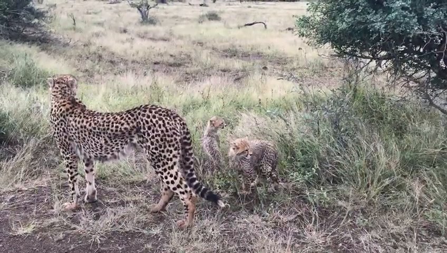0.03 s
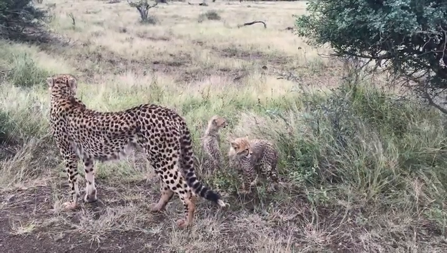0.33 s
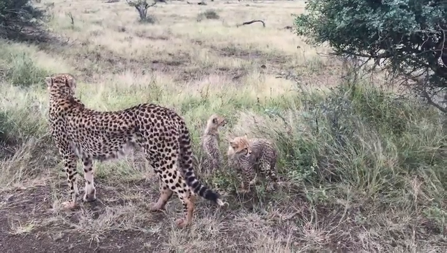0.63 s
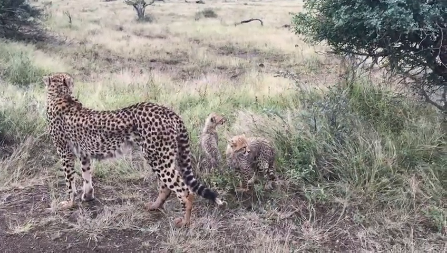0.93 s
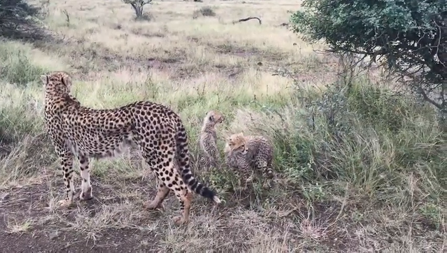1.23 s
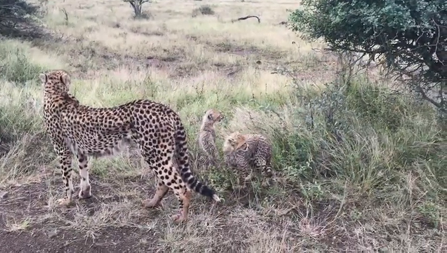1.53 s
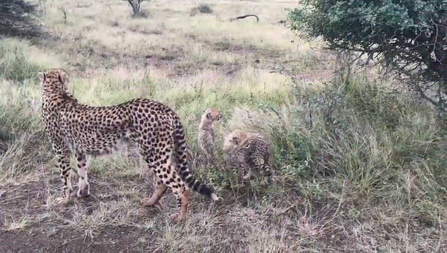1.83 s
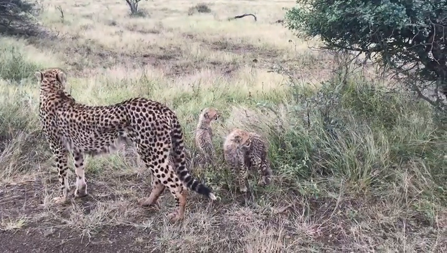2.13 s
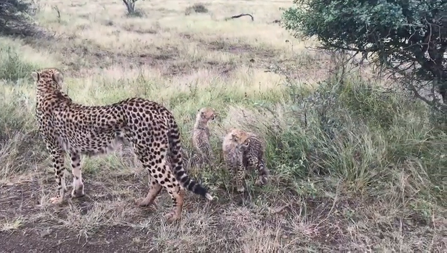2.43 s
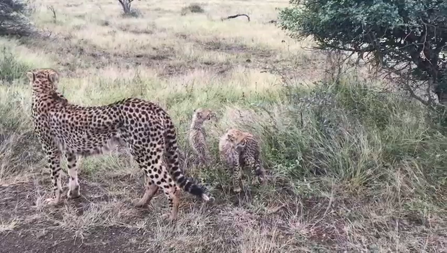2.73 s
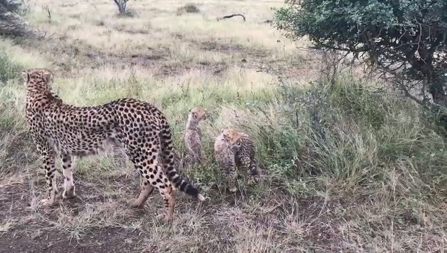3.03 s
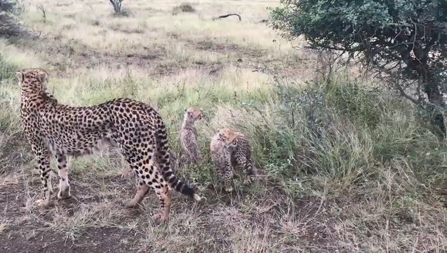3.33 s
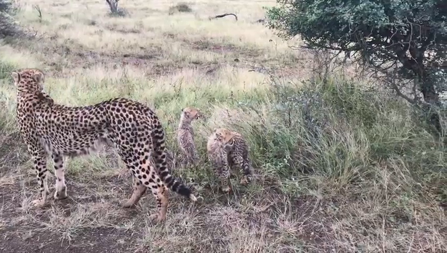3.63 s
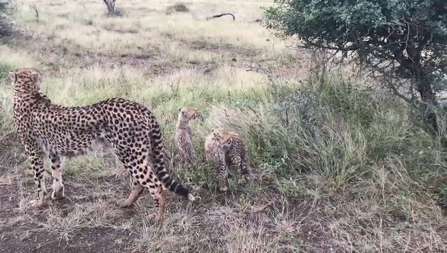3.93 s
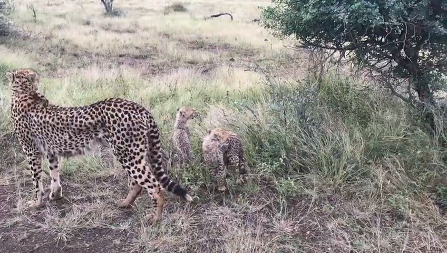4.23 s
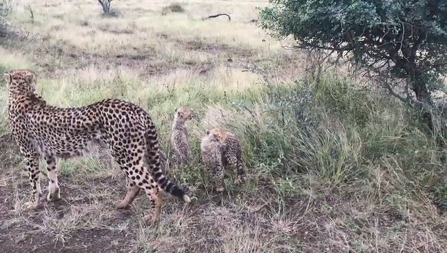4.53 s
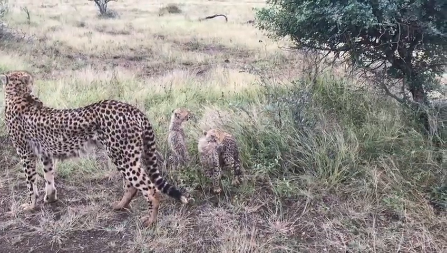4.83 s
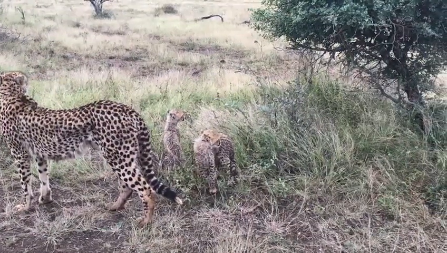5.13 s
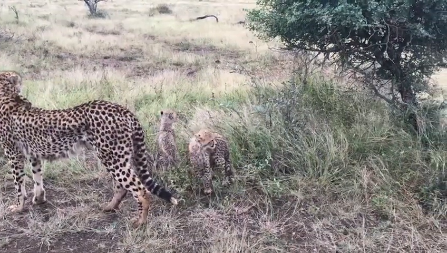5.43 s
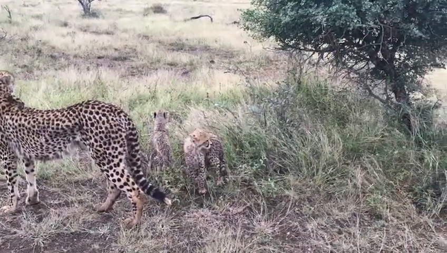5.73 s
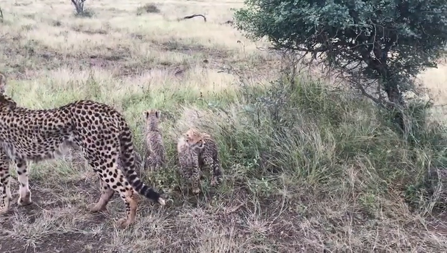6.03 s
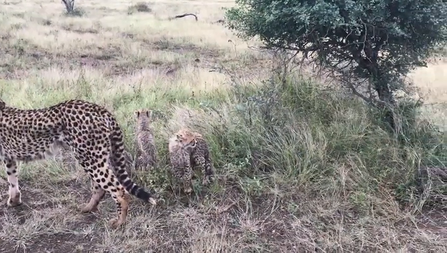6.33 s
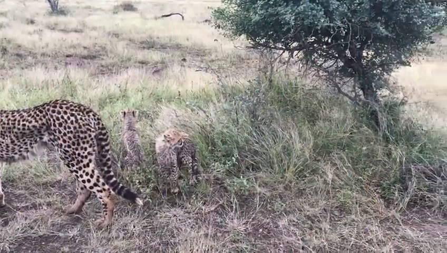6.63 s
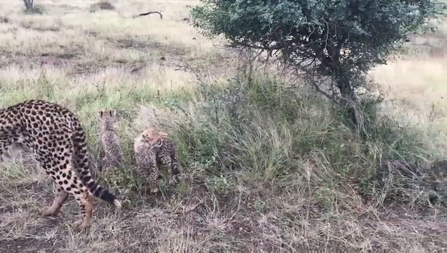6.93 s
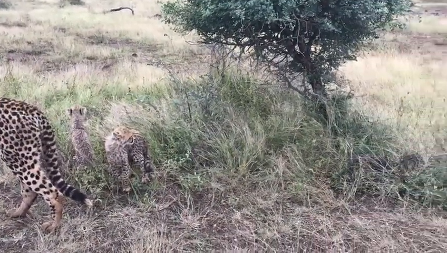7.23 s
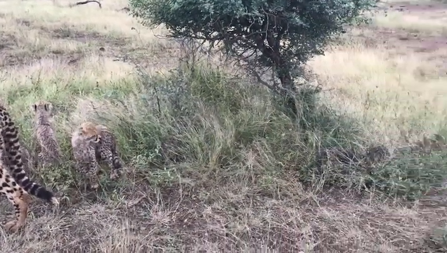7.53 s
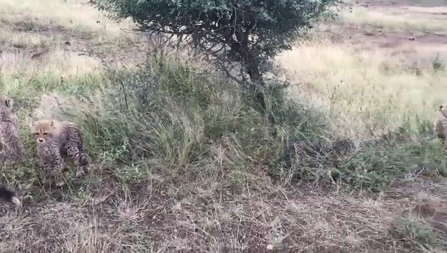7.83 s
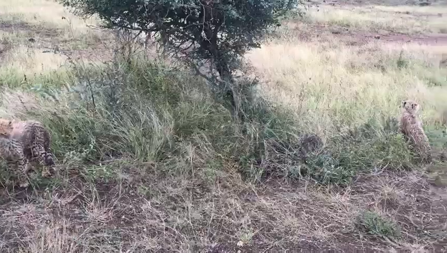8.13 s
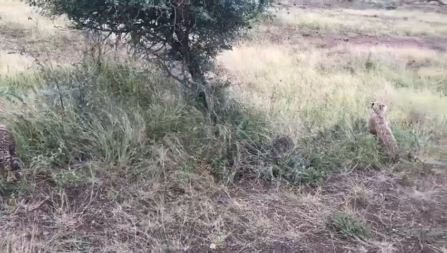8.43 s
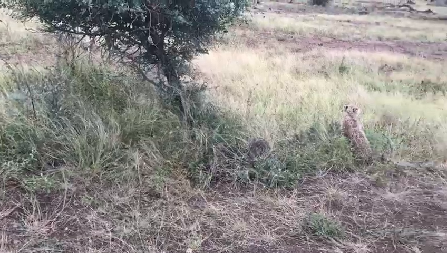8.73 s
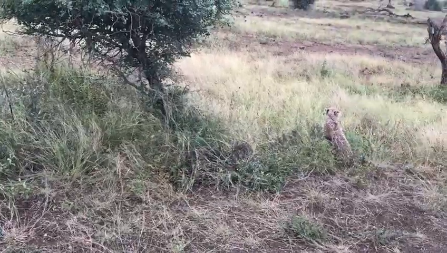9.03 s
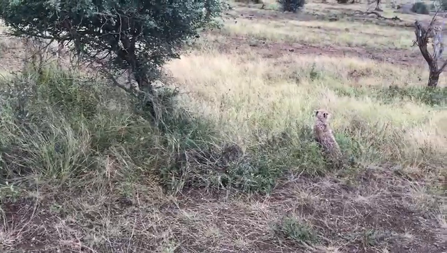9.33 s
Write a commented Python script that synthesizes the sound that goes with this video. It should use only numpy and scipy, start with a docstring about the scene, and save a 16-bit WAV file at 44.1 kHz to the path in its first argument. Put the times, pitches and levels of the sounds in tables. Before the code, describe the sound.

Several birds scold from a thicket in open grassland, packing harsh rasps, fast high rattles and thin sliding chips into a dense chatter, with a faint nasal churr below. Later they calm to soft chirps, then give a short buzzing run. A low wind rumble and a far engine rising and falling lie underneath, and dry grass crackles faintly now and then.

```python
"""Birds scolding in dry grassland

Unseen birds push puffs of air through syrinx and throat: harsh rasps, fast rattles, a nasal buzz,
high sliding chips, soft chirps and a low churr, all scattered back by the bushes.
A far engine rises and falls over a low wind rumble, and the dry grass crackles now and then."""
import sys
import numpy as np
from scipy import signal
from scipy.fft import rfft, irfft
from scipy.io import wavfile

SR = 44100
rng = np.random.default_rng(int(sys.argv[2]) if len(sys.argv) > 2 else 0)


def master(y):
    """Save y as 16-bit WAV."""
    cut = np.clip(np.atleast_2d(y).T, -1, 1)
    pcm = np.round(cut * 32767)  # scale
    wavfile.write(sys.argv[1], SR, pcm.astype(np.int16))


N = 418068
TICK_S = 0.0048
# low throat resonances of rasps and chirps: centre_hz, width_hz, level_db
LOW_THROAT = [(1094, 19, -26.5), (1817, 29, -17), (2195, 60, -11), (2682, 180, -8), (3510, 640, -9)]


def from_db(db):
    return 10 ** (np.asarray(db) / 20)


def unit_rms(x):
    return x / np.sqrt(np.mean(x ** 2) + 1e-20)


def phase_of(hz):
    return 2 * np.pi * np.cumsum(hz) / SR


def at_hz(points, hz):
    """Reads a spectrum on a log-frequency axis."""
    point_hz, db = np.transpose(points)
    return np.interp(np.log(hz + 1e-9), np.log(point_hz), db)


def add(out, start_s, sound):
    """Mixes a sound in at its start time."""
    i = max(round(start_s * SR), 0)
    out[i:i + len(sound)] += sound[:max(N - i, 0)]


def smooth(x, hz):
    """Two one-pole low-passes."""
    r = np.exp(-2 * np.pi * hz / SR)
    return signal.lfilter([(1 - r) ** 2], [1, -2 * r, r * r], x)


def drift(size, hz):
    """A smooth random wander, rms 1."""
    run_in = int(SR / hz)
    return unit_rms(smooth(rng.standard_normal(size + run_in), hz)[run_in:])


def resonate(source, resonances, bend, uneven_db=0):
    """Resonances whose centres all follow one bend; each rings at its own rms level."""
    out = 0
    for hz, width, db in resonances:
        carrier = np.exp(1j * phase_of(hz * bend))
        band = (smooth(source / carrier, 0.66 * width) * carrier).real
        out = out + from_db(db + uneven_db * rng.standard_normal()) * unit_rms(band)
    return out


def wind(level_db=-49.34):
    """A steady bed of air with a low rumble and a faint far hum in it."""
    # colour of the wind: frequency_hz, relative_db
    spectrum = [(25, -14), (55, 5.5), (140, 3.5), (300, -3.5), (390, -7), (750, -16), (1500, -20),
                (5200, -27.5), (12000, -39)]
    # rumble and hum bands: centre_hz, width_hz, level_db
    hums = [(49.5, 12.2, -52), (376.7, 29, -65)]
    colour = from_db(at_hz(spectrum, np.fft.rfftfreq(N, 1 / SR)))
    wash = unit_rms(irfft(rfft(rng.standard_normal(N)) * colour, N))
    return from_db(level_db) * wash + resonate(rng.standard_normal(N), hums, np.ones(N))


def far_engine(fade_db=2.0):
    """The firing tone and its overtones glide through the exhaust resonances, fading in and out."""
    # engine revs: time_s, firing_hz, level_db ahead of the exhaust
    revs = [(0.0, 69.1, -46), (0.37, 74.3, -34), (0.53, 79.8, -40.5), (0.71, 73.6, -49), (1.21, 75.78, -42),
            (1.631, 66.82, -51), (2.401, 68.56, -52), (2.949, 58.15, -60.5), (3.149, 56.35, -51.5),
            (5.5, 56.8, -65), (5.751, 60.85, -50), (6.07, 66.45, -51.5), (6.92, 58.38, -46.5),
            (7.29, 65.62, -49), (7.97, 52.6, -51), (8.5, 61.05, -51.5), (8.87, 61.04, -57),
            (9.48, 56.7, -57)]
    # exhaust colour: frequency_hz, gain_db
    exhaust = [(58, 6), (66, 3), (71, -17), (110, -1), (146, 1), (165, -6.5), (200, -2), (220, -36),
               (320, -30.5)]
    time_s, *columns = np.transpose(revs)
    hz, db = (np.interp(np.arange(N) / SR, time_s, column) for column in columns)
    out = np.zeros(N)
    for harmonic in range(1, 5):
        gain = from_db(db + at_hz(exhaust, harmonic * hz) + fade_db * drift(N, 3.24))
        out += gain * np.sqrt(2) * np.sin(harmonic * phase_of(hz))
    return out


def dry_grass(snaps_per_s=260):
    """Dry stems give way in clusters of small snaps."""
    # stirs of the grass: start_s, length_s, level_db
    rustles = [(1.49, 0.24, -56.5), (4.928, 0.34, -58), (6.293, .024, -52.5)]
    out = np.zeros(N)
    for start, length, db in rustles:
        size = int(length * SR)
        snaps = (rng.random(size) < snaps_per_s / SR) * rng.standard_normal(size)
        add(out, start, resonate(snaps, [(1320, 5400, db)], np.ones(size)))
    return out


def bushes(x, wet_db=-10.5, t60_s=0.2):
    """Leaves and stems scatter a short, faint tail."""
    t = np.arange(int(t60_s * SR)) / SR
    tail = rng.standard_normal(len(t)) * from_db(-60 * t / t60_s) * (t > .004)
    return x + from_db(wet_db) * signal.fftconvolve(x, tail / np.linalg.norm(tail))[:N]


def syrinx(size, pulse_hz, jitter, sharpness):
    """The syrinx opens in short, slightly uneven puffs; rms 1."""
    phase = phase_of(pulse_hz * (1 + jitter * drift(size, 169)))
    return unit_rms(np.abs(np.sin(phase / 2)) ** sharpness)


def whistle(hz, waver):
    """A tone whose pitch trembles from puff to puff."""
    return np.sqrt(2) * np.sin(phase_of(hz * (1 + waver * drift(len(hz), 740))))


def stammer(size, depth, hz=112):
    """A tremolo that breaks a tone into quick pips."""
    return 1 - np.clip(depth, 0, 1) * np.cos(phase_of(hz * (1 + 0.16 * drift(size, 41.6))))


def churrs(pulse_hz=430, wander=0.033):
    """A lower bird holds long nasal notes that swell and fade while its throat slowly shifts."""
    # held notes: start_s, length_s, level_db
    notes = [(0.198, 3.15, -59.5), (3.62, 0.73, -50), (4.621, 0.47, -54), (8.351, 0.81, -56)]
    # throat resonances: centre_hz, width_hz, gain_db
    throat = [(1092, 46, -16), (1880, 81, -9.5), (2190, 190, -1.5), (3000, 450, -11)]
    out = np.zeros(N)
    for start, length, db in notes:
        size = int(length * SR)
        air = syrinx(size, pulse_hz, jitter=0.104, sharpness=7) * rng.standard_normal(size)
        swell = np.sqrt(np.abs(np.sin(np.linspace(0, np.pi, size))))
        add(out, start, from_db(db) * swell * resonate(air, throat, 1 + wander * drift(size, 2.155)))
    return out


def pip(hz, db, length_s, sag=0.041):
    """A short, slightly rough tone that sags in pitch."""
    u = np.linspace(-1, 1, int(length_s * SR))
    grit = 1 + drift(len(u), hz / 10) / 2
    return from_db(db) * (1 - u ** 2) * grit * whistle(hz * (1 - sag * u), waver=0.03)


def ticks(pitch_hz=5100):
    """Lone pips between the calls, so short that they click."""
    # ticks: centre_s, level_db
    cues = [(4.405, -32), (4.585, -34)]
    out = np.zeros(N)
    for centre, db in cues:
        add(out, centre - TICK_S / 2, pip(pitch_hz, db, TICK_S))
    return out


def squeaks(length_s=0.022):
    """A call catches briefly on one tone."""
    # squeaks: centre_s, pitch_hz, level_db
    cues = [(0.418, 2764, -34), (0.891, 2760, -38.5), (.94, 3950, -41), (3.7, 3710, -40),
            (4.614, 4090, -33.5), (4.985, 2800, -37), (5.737, 2760, -43), (5.908, 2740, -35),
            (6.052, 2740, -42.5), (6.082, 5300, -41.5), (6.207, 2740, -40), (6.351, 2700, -39.5),
            (6.532, 4780, -36), (7.385, 4000, -60), (8.692, 4130, -46.5)]
    out = np.zeros(N)
    for centre, hz, db in cues:
        add(out, centre - length_s / 2, pip(hz, db, length_s))
    return out


def chirps(length_s=0.0525, scrape_db=-6):
    """Rounded, stammering whistles that each end in a soft scrape of the throat."""
    # chirps in the chatter, softer as the bird calms down: start_s, level_db
    cues = [(2.003, -42), (2.152, -41), (2.551, -46), (4.445, -43.5), (5.251, -41), (6.482, -56),
            (6.604, -49.5), (6.865, -47.5), (7.004, -48.5), (7.131, -49.5), (7.264, -49.5), (7.404, -50.5),
            (7.528, -50), (7.718, -53.5), (7.852, -53.5), (7.99, -48), (9.034, -46), (9.343, -47.5)]
    # the pitch dips, arches and falls: share_of_call, pitch_hz
    contour = [(0, 5000), (.25, 4550), (.45, 5200), (1, 4850)]
    u = np.linspace(0, 1, int(length_s * SR))
    envelope = np.interp(u, [0, .25, .5, 1], [0.46, 0.97, 0.41, 0.22])
    throat = LOW_THROAT + [(5780, 2300, -4.5)]
    out = np.zeros(N)
    for start, db in cues:
        puffs = syrinx(len(u), 520, jitter=.3, sharpness=2)
        shape = stammer(len(u), depth=0.67) * (u * puffs + (1 - u)) * envelope
        pitch = np.interp(u, *np.transpose(contour)) * (1 + 0.0202 * rng.standard_normal())
        tone = unit_rms(shape) * whistle(pitch, waver=0.068)
        breath = resonate(puffs * rng.standard_normal(len(u)), throat, 1 + 0.184 * (.3 - u))
        scrape = from_db(scrape_db) * unit_rms(u * np.sqrt(1 - u) * breath)
        add(out, start, from_db(db) * (tone + scrape))
    return out


def chips(length_s=0.04, fall=0.29, crest=0.235):
    """Thin, stammering whistles that crest early and slide steeply down."""
    # bright chips above the chatter: start_s, top_pitch_hz, level_db
    cues = [(0.772, 6700, -38.5), (0.885, 7500, -44.5), (0.995, 7340, -46), (1.122, 6530, -40.5),
            (1.914, 7670, -41), (2.08, 7680, -40.5), (2.208, 8100, -47), (2.333, 8000, -42.5),
            (2.466, 7950, -42.5)]
    u = np.linspace(0, 1, int(length_s * SR))
    envelope = np.sqrt(np.abs(np.sin(np.pi * u)))
    slide = 1 - fall * ((u - crest) / (1 - crest)) ** 2
    out = np.zeros(N)
    for start, hz, db in cues:
        shape = envelope * stammer(len(u), depth=0.59) * syrinx(len(u), 465, jitter=0.247, sharpness=1)
        add(out, start, from_db(db) * unit_rms(shape) * whistle(hz * slide, waver=0.025))
    return out


def note_runs(runs, throat, duty, pulse_hz, steady, uneven_db, hold, detune, looseness, answer_db):
    """Each note is a few puffs of whistle that also ring the throat; a second bird throws in its own."""
    arch, waver, partial_ratio = 0.068, 0.034, 1.42
    tone, air = np.zeros(N), np.zeros(N)
    for first, last, count, hz, db in runs:
        spacing = (last - first) / (count - 1)
        u = np.linspace(-1, 1, int(spacing * SR))
        gate = np.maximum(1 - (u / duty) ** 4, 0)
        partial_gain = from_db(-17.5 + 700 * (min(spacing, .025) - .02))  # slower notes are brighter
        for centre in np.linspace(first, last, count):
            accent, pitch, pace, late, slant, other, offset = rng.standard_normal(7)
            start = centre + spacing * (looseness * late - 1 / 2)
            pulses = syrinx(len(u), pulse_hz * (1 + 0.082 * pace), jitter=0.13, sharpness=2.3)
            puffs = (1 - u ** 10) * unit_rms(steady + pulses)
            puffs *= from_db(db + uneven_db * (accent + drift(len(u), 237)))
            glide = hz * (1 + 0.0327 * slant * u + arch * (.15 - u ** 2) + detune * pitch)
            voice = whistle(glide, waver) + partial_gain * whistle(glide * partial_ratio, waver)
            add(tone, start, puffs * (gate + hold ** 2) * voice)  # hold lets sound bleed past the gate
            add(air, start, puffs * (gate + hold) * rng.standard_normal(len(u)))
            answer = puffs[::-1] * gate * whistle(glide * (1 + 0.076 * other), waver)
            add(tone, start + spacing * offset / 2, from_db(answer_db + 2 * other) * answer)
    return tone + np.std(tone) * resonate(air + 1e-12, throat, 1 + 0.025 * drift(N, 3.95))


def rattles():
    """Fast runs of short, deeply pulsed notes."""
    # runs: first_note_s, last_note_s, note_count, pitch_hz, level_db
    runs = [(.19, .293, 6, 5210, -39.5), (.313, .608, 16, 5260, -37.5), (.81, .846, 4, 5160, -29.5),
            (.915, 1.219, 15, 5320, -42), (1.251, 1.321, 7, 5170, -39), (1.33, 1.617, 18, 4746, -38.5),
            (1.634, 1.772, 9, 4885, -34), (1.787, 2.095, 16, 5074, -38.5), (2.113, 2.529, 19, 4980, -43),
            (2.6, 2.911, 17, 5206, -40), (3.402, 3.43, 3, 5150, -40.5), (3.537, 3.566, 3, 4624, -43),
            (3.653, 3.792, 13, 5100, -36.5), (3.808, 4.018, 11, 4980, -33.5),
            (4.053, 4.33, 14, 4990, -40.5), (4.62, 4.75, 9, 4684, -35.5), (4.767, 4.995, 13, 4683, -34.5),
            (5.012, 5.115, 6, 4130, -40), (5.425, 5.465, 4, 5030, -33.5)]
    # throat resonances: centre_hz, width_hz, gain_db
    throat = [(1873, 72, -25.5), (2800, 530, -15), (7070, 1940, -17.5)]
    return note_runs(runs, throat, duty=.6, pulse_hz=385, steady=.2, uneven_db=1.8,
                     hold=.44, detune=.018, looseness=.07, answer_db=-7)


def buzzes(trim_db=-2.5):
    """Runs of longer, steadier notes with a strong nasal ring of the throat."""
    # runs: first_note_s, last_note_s, note_count, pitch_hz, level_db ahead of the trim
    runs = [(8.074, 8.18, 5, 4825, -45), (8.212, 8.47, 7, 4850, -44.5), (8.49, 8.79, 18, 5020, -47),
            (8.816, 8.866, 2, 5180, -38.5), (8.924, 8.997, 2, 5270, -38)]
    # throat resonances: centre_hz, width_hz, gain_db
    throat = [(1946, 160, -12.5), (3480, 2200, -12.5), (6860, 1480, -6)]
    return from_db(trim_db) * note_runs(runs, throat, duty=.65, pulse_hz=440, steady=1.2, uneven_db=1.3,
                                        hold=.5, detune=.012, looseness=.04, answer_db=-12)


def rasp(length_s, low_db, whistle_db, edge_db):
    """A whistle that bends and breaks into a harsh scrape, the throat shaped anew for every call."""
    # bright resonance of the scrape: centre_hz, width_hz, gain_db
    edge_band = [(6595, 1450, -2)]
    # the low throat speaks at once and dies away: share_of_call, relative_gain
    low_envelope = [(0, 0.1), (.07, 0.79), (.55, 0.83), (1, 0.29)]
    u = np.linspace(0, 1, int(1.1 * length_s * SR))
    size = len(u)
    puffs = syrinx(size, 520, jitter=.3, sharpness=2.2)
    bend = np.sin(np.pi * .75 * u)
    # the whistle starts clean, breaks into puffs and stutters as the effort runs out
    stutter = stammer(size, depth=(-38.5 - whistle_db) / 12 + u)
    broken = np.minimum(4 * u, 1)
    envelope = np.interp(u, [0, .2, .7, 1], [0.34, 0.85, 0.39, 0.2])
    shape = unit_rms(stutter * (1 - broken + broken * puffs) * envelope)
    # soft calls arch upward, loud ones flick downward; at -44 dB there is no arch
    arch = np.clip(-0.03 * (max(low_db, whistle_db, edge_db) + 44), -.13, .14)
    centre_hz = 4480 + 70 * np.clip(whistle_db - low_db, 0, 7)  # higher the more it stands out
    pitch = centre_hz * (1 + arch * (bend - .6)) * (1 + .04 * drift(size, 90))
    tone = from_db(whistle_db) * shape * whistle(pitch, waver=0.055 * np.sqrt(broken))
    # the scrape swells behind the whistle
    swell = unit_rms(np.interp(u, [0, .18, .6, 1], [0.17, 0.51, 0.7, 0.034]))
    push = unit_rms(np.interp(u, *np.transpose(low_envelope)))
    air = puffs * rng.standard_normal(size)
    low = resonate(air, LOW_THROAT, 1 + 0.084 * (np.sin(np.pi * u) - .7), uneven_db=2.5)
    edge = resonate(air, edge_band, 1 + 0.048 * (bend - .8) + 0.031 * rng.standard_normal())
    hoarse = resonate(air, [(5520, 440, -5.5)], np.ones(size))
    return tone + from_db(low_db) * push * low + from_db(edge_db) * swell * (edge + hoarse)


def scolding(lead_s=0.015, lead_db=-7, lead_hz=4500):
    """Bouts of evenly paced rasps that swell or fade; a tiny pip leads into every call."""
    # bouts: first_call_s, last_call_s, call_count, nominal_length_s, first_level_db, last_level_db,
    # whistle_offset_db, edge_offset_db
    bouts = [(0.012, 0.302, 3, 0.064, -43.5, -46, 3, 2), (0.392, .4, 1, 0.18, -42.5, -49, -9, -4.5),
             (0.628, 0.64, 1, 0.073, -43, -36, 6.5, 3), (0.765, 1.104, 4, 0.051, -40.5, -44, -4.5, 0.5),
             (1.236, 1.899, 6, 0.066, -43, -45, -4, 0), (2.066, 2.456, 4, 0.073, -45.5, -47, -21, 0.5),
             (2.593, 2.847, 3, 0.066, -45.5, -47, 4, -1), (3, 3.364, 4, 0.046, -47.5, -49, 11, 5),
             (3.47, 3.595, 2, 0.037, -48, -45, 6.5, -1), (3.942, 3.946, 1, 0.11, -45, -48, -8, 4),
             (4.042, 4.208, 2, 0.071, -39.5, -44.5, 4, -0.5), (4.352, 4.474, 2, 0.054, -41, -40.5, 3, -1.5),
             (4.964, 5.289, 3, 0.05, -42.5, -42, 8.5, -2),
             (5.381, 5.638, 3, 0.038, -38.5, -41.5, 1.5, -1.5), (5.57, 5.72, 2, 0.039, -40, -40, 6, -4.5),
             (5.786, 5.955, 2, 0.055, -40.5, -42, -0.5, -0.5), (5.891, 5.891, 1, 0.049, -39.5, -38, 6, 3.5),
             (6.026, 6.191, 2, 0.065, -45.5, -42, -4.5, -2.5),
             (6.336, 6.336, 1, 0.041, -38.5, -35.5, -4.5, 0),
             (6.524, 6.728, 2, 0.044, -41.5, -45.5, -7, -2), (9.158, 9.276, 2, 0.053, -46, -49, 4, 1)]
    out = np.zeros(N)
    for first, last, count, length, first_db, last_db, whistle_db, edge_db in bouts:
        for start, db in zip(np.linspace(first, last, count), np.linspace(first_db, last_db, count)):
            add(out, start, rasp(length, db, db + whistle_db, db + edge_db))
            pip_hz = lead_hz * (1 + 0.068 * rng.standard_normal())
            add(out, start - lead_s, pip(pip_hz, db + lead_db, TICK_S))
    return out


def scene():
    """All the birds call from one thicket, over engine, wind and grass."""
    birds = rattles() + buzzes() + scolding() + chips() + chirps() + ticks() + churrs() + squeaks()
    return (bushes(birds) + far_engine() + wind() + dry_grass())[None]


def record(dry):
    """A steep low-pass cuts the top."""
    cutoff_hz = 12100
    return signal.sosfilt(signal.ellip(10, .2, 80, cutoff_hz, fs=SR, output="sos"), dry)


dry = scene()
out = record(dry)
master(out)
```